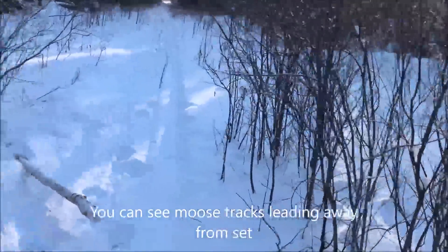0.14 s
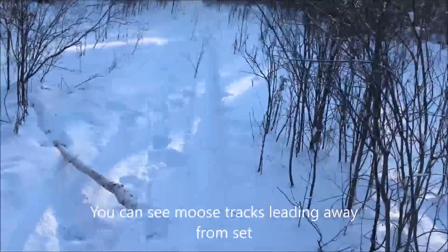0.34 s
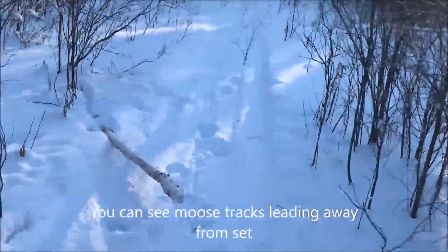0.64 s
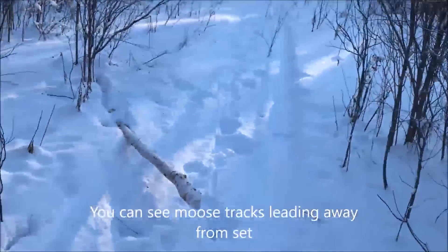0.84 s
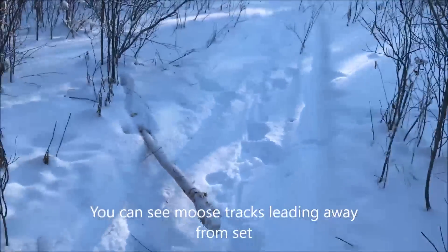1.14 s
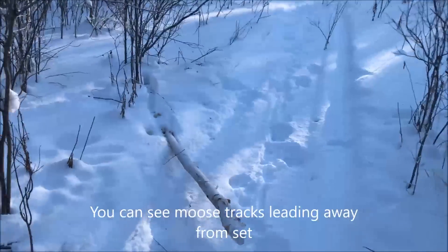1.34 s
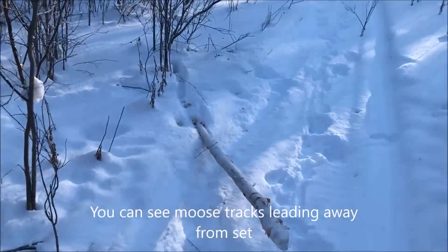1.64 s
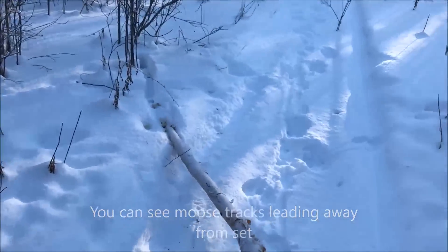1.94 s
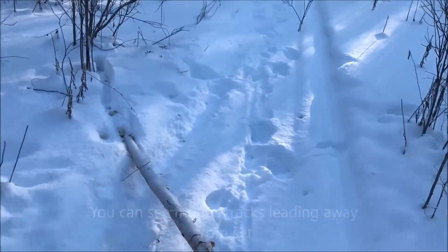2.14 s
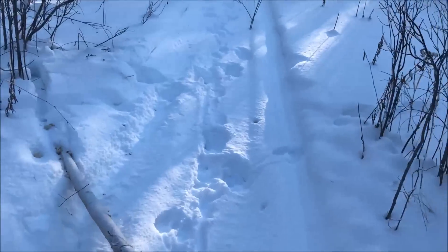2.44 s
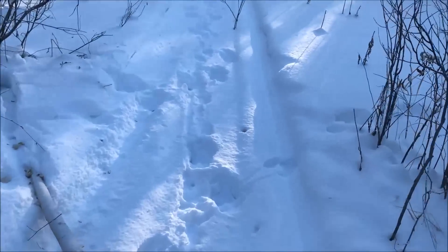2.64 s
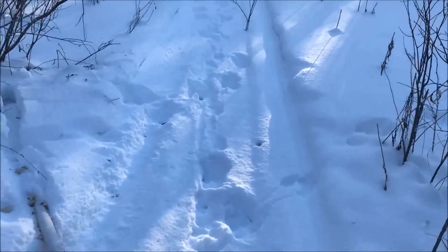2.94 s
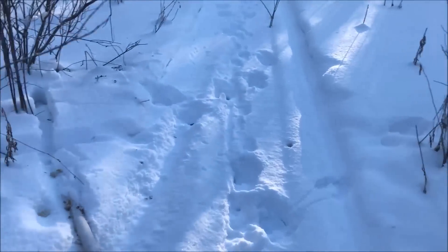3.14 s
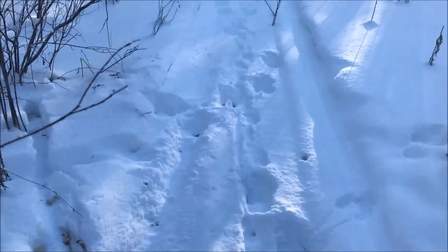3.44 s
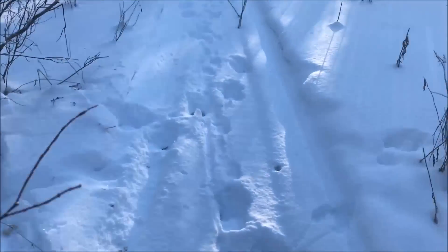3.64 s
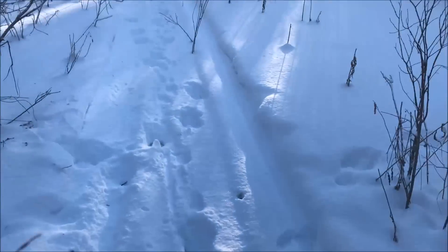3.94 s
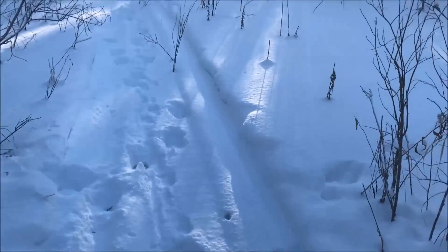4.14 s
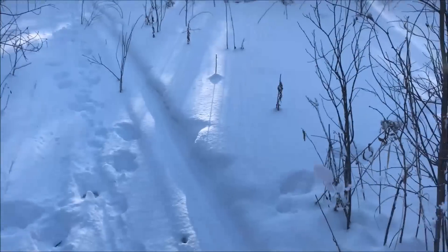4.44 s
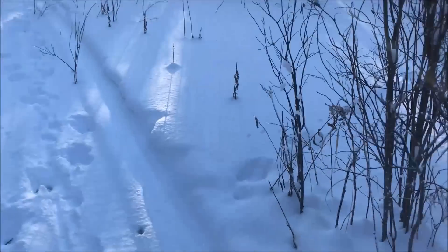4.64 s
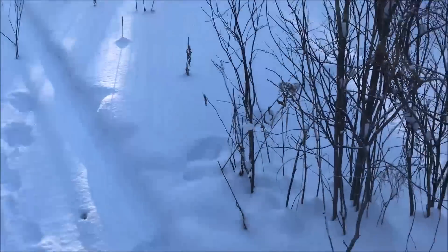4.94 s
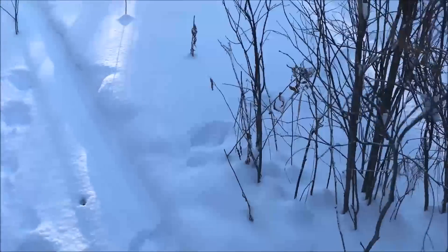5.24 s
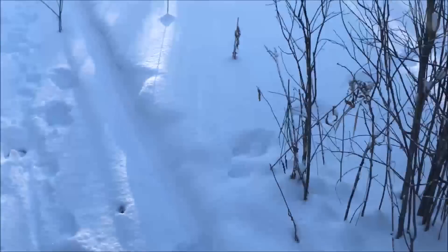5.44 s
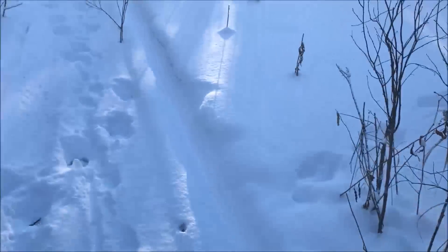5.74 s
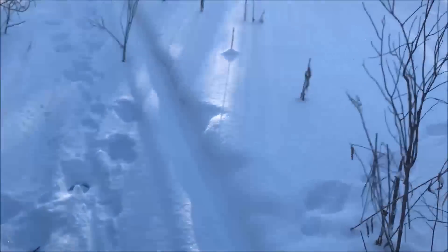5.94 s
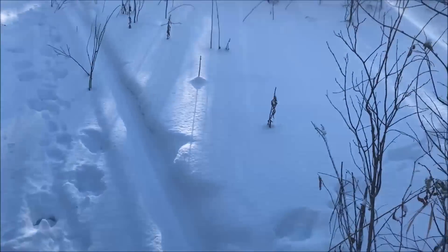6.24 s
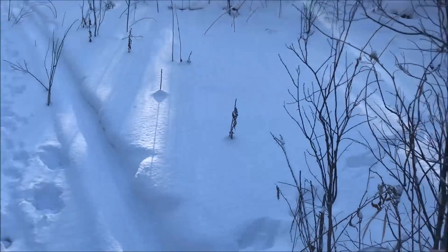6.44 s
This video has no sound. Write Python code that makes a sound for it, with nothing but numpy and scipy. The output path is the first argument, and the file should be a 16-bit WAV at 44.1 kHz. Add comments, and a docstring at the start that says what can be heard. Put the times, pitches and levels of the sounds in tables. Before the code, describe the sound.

A deep, lumpy engine idle runs throughout, sinking slightly as the walker moves off. Over it, near the microphone, come irregular snow crunches, soft low thuds, gritty creaks and rubbing fabric. One dry twig-like crack stands out early, bright cloth swishes mid-way, then a quieter lull before a heavy, crackly burst of movement. Dry mono sound, open winter air, no echo.

```python
"""A low exhaust tone lopes some way off: a snowmobile idling, its firings coming strong and weak.
Its partials swell and sag with the lope over a noise rumble, steady clatter and ringing hollows.
Close to the microphone someone walks in dry snow: shaped grains and chips make the boots crunch
and groan and the clothes rustle and swish. Crust and a twig snap in short bursts of ring or noise,
and dull thuds land underneath."""
import sys
import numpy as np
from scipy import signal
from scipy.fft import rfft, irfft
from scipy.io import wavfile
from scipy.ndimage import uniform_filter1d

SR = 44100
rng = np.random.default_rng(int(sys.argv[2]) if len(sys.argv) > 2 else 0)


def generate_wav(sig):
    """Save sig (samples, or channels by samples) to the path in sys.argv[1] as 16-bit PCM at SR."""
    pcm = np.round(np.clip(np.atleast_2d(sig).T, -1, 1) * 32767).astype(np.int16)
    wavfile.write(sys.argv[1], SR, pcm)


N = 291060

# Firing rate of the engine before the sag: t/s, f/Hz
FIRING_RATE = [(0.15, 67.0), (0.8, 66.6), (1.35, 67.0), (1.95, 65.9), (2.84, 67.9), (3.14, 67.5),
               (3.44, 67.8), (4.2, 67.0), (4.7, 68.2), (5.84, 67.5), (6.44, 67.35)]
# Surges of the lope: peak t/s, swell above the lull before/dB
LOPE_SURGES = [(0.025, 5.4), (0.106, 4.6), (0.23, 8.1), (0.32, 6.2), (0.425, 6.7), (0.53, 6.8),
               (0.638, 8.0), (0.758, 7.2), (0.862, 8.6), (0.954, 6.2), (1.064, 4.3), (1.192, 6.1),
               (1.301, 6.2), (1.392, 6.2), (1.501, 4.7), (1.609, 8.3), (1.701, 6.5), (1.803, 5.9),
               (1.926, 4.9), (2.058, 10.9), (2.16, 9.0), (2.276, 7.2), (2.4, 5.4), (2.508, 10.0),
               (2.633, 7.5), (2.747, 10.2), (2.855, 8.1), (2.98, 8.9), (3.122, 6.2), (3.22, 5.9),
               (3.342, 7.8), (3.462, 6.0), (3.6, 6.0), (3.694, 10.3), (3.78, 7.2), (3.872, 1.6),
               (3.957, 6.5), (4.048, 5.9), (4.133, 4.9), (4.253, 7.0), (4.406, 7.6), (4.524, 7.3),
               (4.64, 7.3), (4.727, 7.5), (4.842, 5.7), (4.95, 6.8), (5.073, 7.3), (5.201, 7.6),
               (5.281, 4.4), (5.36, 4.9), (5.46, 6.3), (5.584, 8.2), (5.702, 6.5), (5.804, 7.4),
               (5.887, 8.5), (5.992, 8.5), (6.116, 7.3), (6.226, 6.4), (6.357, 8.9), (6.44, 4.5),
               (6.536, 9.6)]
# Lope level at the peak of a usual surge, sinking as the walker moves away: t/s, level/dB
USUAL_SURGE_PEAK = [(0, -22.9), (1, -23.3), (2.3, -24.3), (3.3, -24.1), (4.4, -25.2), (6.6, -25.2)]
SWELL_SHARE = .47  # the swell takes this share of the time since the surge before
LIFT, USUAL_SWELL_DB = .2, 7  # a bigger swell also peaks higher, by this share
# Exhaust partials: multiple of the firing rate, level against the mean lope/dB, lope following/0-1
EXHAUST_PARTIALS = [(.5, -40, .2), (1, 0, 0.9), (1.5, -23, 0), (2, -25, 0), (2.5, -41, 0.3), (3, -42.5, 0),
                    (3.5, -39, 0.6), (4, -44.5, 0.4)]
SAG_HZ = 3.2  # rms at full following: pitch runs high as a surge swells and low as it dies
# Uneven firings blurred into a rumble, relative spectrum: f/Hz, level/dB per Hz
RUMBLE_SPECTRUM = [(22, -26), (31, -20), (39, -5), (47, 1.5), (55, -6), (67, -24), (80, -11), (90, -3),
                   (110, -9), (125, -14), (160, -19), (250, -26), (500, -47)]
RUMBLE_DB, RUMBLE_FOLLOW = -44, .15  # level at the mean lope; how far it follows the lope, 0-1
# Engine clatter and hiss under everything, relative spectrum: f/Hz, level/dB per Hz
CLATTER_SPECTRUM = [(120, 0), (200, -9), (310, 2), (372, 12), (455, 4), (644, -3), (719, -22), (1240, 4),
                    (1860, -29.5), (3280, -13), (4900, -32), (5470, -1.5), (7740, -20), (12900, -51.5),
                    (15800, -59)]
CLATTER_DB = -66.5  # rms before the final band limit
# Ringing hollows of the machine: f/Hz, width/Hz, level at the mean lope/dB
ENGINE_HOLLOWS = [(251, 4, -70), (358, 14, -64.5), (650, 27, -62), (750, 14, -75), (818, 14, -109)]

# Strokes of rubbing clothes: peak t/s, build-up/s, die-away/s, rustle gain/dB, swish gain/dB
CLOTH_STROKES = [(0.0, .01, 0.07, -57, -62), (.26, 0.28, 0.1, -61, -63.5), (.66, 0.063, 0.037, -55, -57.5),
                 (.77, 0.06, 0.092, -51.5, -56), (.84, 0.049, 0.028, -42, -54),
                 (.89, 0.013, .1, -48.5, -58), (.94, 0.052, 0.021, -41, -50.5),
                 (1.03, 0.077, 0.047, -41.5, -51), (1.135, 0.016, 0.024, -40, -43),
                 (1.17, .015, 0.07, -41.5, -54), (1.21, 0.037, .02, -41.5, -64),
                 (1.25, .03, 1, -53.5, -61.5), (1.63, 0.5, 0.023, -65, -74), (1.97, 0.23, 0.02, -41.5, -51),
                 (2.04, 0.037, 0.12, -56, -64), (2.257, 0.01, 0.031, -43.5, -51),
                 (2.28, 0.03, 0.01, -44, -50), (2.32, 1, .4, -53.5, -63), (2.43, .06, 0.011, -45.5, -50),
                 (2.52, 0.074, 0.0067, -47, -47.5), (2.6, 0.052, 0.36, -50, -51),
                 (2.72, 0.13, 0.35, -50, -52), (2.9, 0.16, 0.16, -51.5, -72), (2.99, .05, 0.046, -50, -62),
                 (3.075, 0.018, 0.019, -53, -69), (3.25, 0.095, 0.02, -63, -58),
                 (3.39, 0.027, .1, -69, -62), (3.55, 0.25, 0.11, -53, -57), (3.6, .02, 0.051, -57, -62),
                 (3.64, 0.025, 0.024, -54, -57), (3.82, 0.056, 0.035, -53, -59),
                 (3.92, 0.03, 0.04, -49, -62), (4.08, 0.031, 0.12, -38.5, -38),
                 (4.25, 0.087, 0.098, -42, -35.5), (4.37, 0.043, 0.031, -39, -33),
                 (4.49, 0.067, 0.048, -49, -64), (4.69, 0.67, 0.036, -48.5, -49.5),
                 (4.75, 0.041, .04, -68, -58), (4.805, .02, 0.036, -57.5, -54), (5.2, 1, 0.13, -78, -66.5),
                 (5.37, 0.065, 0.08, -57.5, -60), (5.48, 0.13, 0.032, -50.5, -58),
                 (5.53, 0.012, 0.026, -50.5, -55), (5.7, .02, 0.041, -60.5, -74),
                 (5.893, 0.015, 0.034, -53.5, -53), (5.96, 0.022, 0.068, -59, -64),
                 (6.01, 0.14, .06, -51.5, -57), (6.23, 0.01, 0.02, -34.5, -39.5),
                 (6.27, 0.022, 0.1, -39.5, -43.5), (6.44, 0.13, 0.62, -42, -46.5),
                 (6.538, 0.018, 0.041, -26.5, -38), (6.555, .03, 0.023, -32, -35),
                 (6.6, 0.083, .1, -51, -34.5)]
# Grainy rustle of stiff fabric, relative spectrum: f/Hz, level/dB per Hz
RUSTLE_SPECTRUM = [(710, -11), (1200, 1.5), (1710, -3.5), (2660, 1), (2740, 0.5), (3180, 0.5), (3400, 2),
                   (5640, -3), (8500, -13), (11000, -13), (18700, -120)]
# Finer, brighter swish, relative spectrum: f/Hz, level/dB per Hz
SWISH_SPECTRUM = [(3530, -52), (6000, -1.5), (6220, -4.5), (7410, -12), (9640, 2.5), (10500, -5.5),
                  (11300, 1.5), (15000, 2), (15800, -1)]
REST_RUSTLE_DB, REST_SWISH_DB = -65.5, -71  # fabric never lies quite still

# Boots pressing the snow: peak t/s, build-up/s, die-away/s, crunch gain/dB, groan gain/dB
BOOT_STROKES = [(0.0, .01, 0.016, -34.5, -38), (.24, 0.086, 0.054, -51, -46.5),
                (.52, 0.068, 0.031, -68, -49), (.66, 0.11, .3, -60, -52), (.83, 0.084, 0.13, -46.5, -47),
                (.93, 0.091, 0.036, -45, -45.5), (1.03, .07, 0.031, -44, -47),
                (1.19, 0.09, 0.18, -48.5, -44), (1.56, 0.3, 0.22, -48, -47.5),
                (1.91, 0.22, 0.14, -42.5, -42.5), (2.04, .015, 0.041, -50, -52),
                (2.26, .015, 0.057, -43, -41.5), (2.52, 0.81, 0.019, -47.5, -44.5),
                (2.6, 0.061, 0.33, -45, -51), (2.72, 0.19, 0.095, -44.5, -38), (2.84, .03, 0.37, -54, -48),
                (3.01, .04, 0.072, -57, -42.5), (3.178, .015, 0.028, -46.5, -43),
                (3.38, 0.034, 0.11, -53, -48.5), (3.51, 0.085, 0.11, -39.5, -43.5),
                (3.595, .015, .04, -47, -42.5), (3.64, 0.015, 0.024, -45, -40),
                (3.78, 0.017, 0.22, -47, -55), (3.84, 0.037, 0.025, -46, -44), (3.91, .03, 0.11, -57, -68),
                (3.98, 0.011, 0.023, -51, -57), (4.06, 0.042, 0.18, -38.5, -40.5),
                (4.39, 0.072, 0.087, -62, -47.5), (4.7, 0.64, 0.08, -44.5, -56),
                (4.752, .02, 0.039, -37, -44), (4.81, 0.052, .3, -52, -52), (4.922, 0.012, 0.024, -46, -44),
                (5.48, 0.12, 0.082, -41.5, -42.5), (5.97, 0.038, 0.051, -37.5, -36.5),
                (6.23, 0.022, 0.028, -30, -35.5), (6.29, .03, 0.14, -44, -48.5), (6.38, .05, 0.1, -49, -52),
                (6.51, 0.059, 0.2, -42.5, -44.5)]
# Crush of packing snow, relative spectrum: f/Hz, level/dB per Hz
CRUSH_SPECTRUM = [(250, -45), (420, -8), (612, 1.5), (699, -2.5), (885, 1), (1570, -9.5), (2960, -23),
                  (4000, -44), (5200, -43), (8800, -120)]
# Deeper groan of snow packing down, relative spectrum: f/Hz, level/dB per Hz
GROAN_SPECTRUM = [(90, -14), (130, 5), (200, -2.5), (300, -2), (400, -6), (550, -19)]
REST_CRUNCH_DB, REST_GROAN_DB = -56.5, -58.5  # snow settling between the steps
STROKE_DB = 15  # a stroke climbs this much in its build-up and falls this much in its die-away

# In the next three tables level is the envelope peak, before the mix of ring and noise.
# Dull thuds of weight landing: t/s, level/dB, settled pitch f/Hz, t60/s
WEIGHT_THUDS = [(0.237, -46, 127, 0.046), (0.828, -37, 158, 0.083), (1.126, -32, 273, 0.025),
                (1.164, -39, 226, 0.07), (1.211, -19.5, 124, 0.0093), (1.914, -36, 156, 0.055),
                (2.719, -43, 143, 0.026), (3.589, -36, 160, 0.05), (4.045, -35, 119.4, 0.039),
                (6.224, -37, 170, 0.03)]
# Dry snaps: t/s, level/dB, band centre f/Hz
DRY_SNAPS = [(0.9946, -37, 3940), (1.1277, -8.5, 3200), (1.159, -31, 4500), (1.1702, -35, 4050),
             (1.8372, -33, 3640), (2.0308, -45, 3940), (2.415, -35, 3710), (2.5004, -42, 3700),
             (2.5661, -31, 4200), (2.629, -40, 3580), (2.9203, -42, 3890), (2.8918, -50, 3970),
             (2.9816, -42, 3760), (3.2415, -34, 7170), (4.0397, -37, 4170), (4.0747, -23, 11600),
             (4.3261, -38, 11200), (4.3482, -17, 11200), (4.36, -22, 4000), (4.375, -24, 11500),
             (4.4824, -28, 4290), (6.22, -44, 4000), (6.346, -33, 5140), (6.4093, -28, 11700),
             (6.4823, -25, 3550), (6.4996, -28, 3890), (6.5326, -29, 3860), (6.54, -14, 5580)]
SNAP_T60_S = 0.013
# Crust giving way under a boot, often in a quick run: t/s, level/dB, settled pitch f/Hz, run/s
CRUST_BREAKS = [(0.2275, -42, 910, .02), (0.8221, -42, 796, .01), (0.9129, -42, 915, .03),
                (1.0087, -40, 780, .025), (1.1654, -38.5, 675, 0), (1.4238, -39.5, 760, 0),
                (1.5026, -39, 756, .01), (1.5545, -37, 724, 0), (1.6063, -42, 910, .025),
                (1.748, -40, 910, 0), (1.8368, -34, 836, 0), (1.9062, -33.5, 780, 0),
                (1.9366, -38, 777, .04), (2.0239, -34.5, 820, 0), (2.0305, -32.5, 860, .01),
                (2.193, -38.5, 865, 0), (2.2534, -33, 686, .02), (2.4125, -38, 604, 0),
                (2.5053, -37.5, 750, .011), (2.6934, -45, 1010, 0), (2.7148, -37.5, 650, .01),
                (2.7542, -38, 854, .01), (2.9209, -37, 1050, 0), (3.1723, -39.5, 482, .018),
                (3.3788, -39, 960, .011), (3.4646, -38.5, 915, 0), (3.4941, -40, 607, 0),
                (3.528, -34.5, 620, 0), (3.5554, -32.5, 534, .01), (3.5893, -34.5, 690, .01),
                (3.6347, -31, 620, .01), (3.8238, -35.5, 545, .015), (4.0139, -41, 1280, 0),
                (4.0518, -33.5, 850, .01), (4.0727, -38, 770, .032), (4.1296, -39, 1120, 0),
                (4.3596, -42, 2180, 0), (4.7377, -35.5, 680, 0), (4.7449, -33.5, 670, .018),
                (4.9178, -34.5, 670, .01), (5.4661, -44, 650, .022), (5.5215, -37.5, 540, .01),
                (5.8936, -39.5, 900, 0), (5.9624, -37, 865, 0), (5.9718, -34, 604, .016),
                (6.0054, -30, 480, 0), (6.166, -33, 570, .01), (6.2109, -27.5, 650, 0),
                (6.2318, -35, 890, 0), (6.2493, -31.5, 920, .013), (6.363, -29.5, 537, 0),
                (6.4089, -36, 1200, 0), (6.4329, -31.5, 675, .018), (6.4823, -31.5, 1380, 0),
                (6.4997, -36, 920, .01), (6.5322, -28.5, 1980, .01)]
SLIP_GAP_S, SLIP_SPREAD_DB, CRUST_T60_S = .0065, 2, 0.031
SLIP_PITCH_SPREAD = .15  # standard deviation of the natural log of pitch

EDGE_HZ = 15830


def amp(db):
    """Decibels to gain."""
    return 10 ** (np.asarray(db) / 20)


def evened(x):
    """Scales to rms 1."""
    return x / np.sqrt(np.mean(x ** 2) + 1e-20)


def curve(rows, order=1):
    """One column of a table, read at every sample."""
    rows = np.asarray(rows)
    return np.interp(np.arange(N) / SR, rows[:, 0], rows[:, order])


def coloured(x, shape):
    """Filters x through a spectral curve drawn over log frequency, then sets it to rms 1."""
    hz, db = np.transpose(shape)
    f = np.fft.rfftfreq(N, 1 / SR)
    gain = amp(np.interp(np.log(f + 1), np.log(hz), db, -120, -120))
    return evened(irfft(rfft(x) * gain, N))


def sparse_sizes(per_s, spread_db):
    """Random moments of uneven size, zero in between."""
    sizes = amp(spread_db * np.minimum(rng.exponential(1, N), 5))
    return sizes * (rng.random(N) < per_s / SR)


def grains(per_s, spread_db, share, lumps_db, lump_s):
    """Hiss mixed with sparse clicks of uneven size, all in short lumps."""
    clicks = evened(sparse_sizes(per_s, spread_db) * rng.standard_normal(N))
    width = max(int(lump_s * SR), 2)
    smoothed = uniform_filter1d(rng.standard_normal(N), width)
    lumps = evened(uniform_filter1d(smoothed, width))
    share = np.clip(share, 0, 1)
    hiss = np.sqrt(1 - share ** 2) * rng.standard_normal(N)
    return amp(lumps_db * lumps) * (share * clicks + hiss)


def chips(per_s, spread_db, lo_hz, hi_hz, turns):
    """Tiny breaks of uneven size, each ringing a few turns at one of 24 pitches."""
    size = sparse_sizes(per_s, spread_db)
    kind, out = rng.integers(0, 24, N), np.zeros(N)
    for k, hz in enumerate(np.geomspace(lo_hz, hi_hz, num=24)):
        phase = np.arange(0, 4 * turns, hz / SR)
        ring = np.sqrt(hz) * np.sin(2 * np.pi * phase) * np.exp(-phase / turns)
        out += signal.oaconvolve(size * (kind == k), ring)[:N]
    return evened(out)


def strokes(rows, rest_db, order):
    """Gain of one layer: every stroke builds to its peak and dies away, over a resting level."""
    t = np.arange(0, N, 16) / SR
    power = amp(2 * rest_db) * np.ones(len(t))
    for row in rows:
        s, build_s, die_s = row[:3]
        away = np.maximum((s - t) / max(build_s, .005), (t - s) / max(die_s, .005))
        power = power + amp(2 * (row[order] - STROKE_DB * away))
    return np.interp(np.arange(N) / SR, t, np.sqrt(power))


def add(mix, s, sound):
    """Mixes a sound in at time s."""
    part = mix[round(s * SR):][:len(sound)]
    part += sound[:len(part)]


def bursts(events, width, rise_s, ring, noise_db, glide):
    """Short dying sounds: a ring that sinks to its pitch plus noise in a broad band around it."""
    out = np.zeros(N)
    t = np.arange(4000) / SR
    noises = rng.standard_normal((len(events), 4000))
    for (s, db, hz, t60), noise in zip(events, noises):
        t60 = max(t60, .004)
        band = np.clip([hz / width, hz * width], 50, 20000)
        bandpass = signal.butter(2, band, "band", fs=SR, output="sos")
        burst = evened(signal.sosfilt(bandpass, noise))
        shape = (1 - np.exp(-t / rise_s)) * amp(-60 * t / t60)
        turns = np.cumsum(hz * (1 + glide * np.exp(-t / (0.031 * t60)))) / SR
        sound = ring * np.sin(2 * np.pi * turns) + amp(noise_db) * burst
        add(out, s, amp(db) * sound * shape / shape.max())
    return out


def lope():
    """Engine level in dB, easing from lull to surge and back on half cosines."""
    s, swell_db = np.transpose(LOPE_SURGES)
    peak_db = np.interp(s, *np.transpose(USUAL_SURGE_PEAK)) + LIFT * (swell_db - USUAL_SWELL_DB)
    lull_s = s - SWELL_SHARE * np.diff(s, prepend=0)
    times = np.ravel([lull_s, s], "F")  # lull, peak, lull, peak...
    levels = np.ravel([peak_db - swell_db, peak_db], "F")
    points = np.arange(len(times) + 1)
    place = np.interp(np.arange(N) / SR, np.r_[times, N / SR], points)
    eased = np.floor(place) + .5 - .5 * np.cos(np.pi * (place % 1))
    return np.interp(eased, points, np.r_[levels, levels[-1] - USUAL_SWELL_DB])


def clatter():
    """Steady engine clatter and hiss: coloured grains."""
    return coloured(grains(550, 2.2, 0.56, .8, 0.0068), CLATTER_SPECTRUM) * amp(CLATTER_DB)


def hollows(lope_db):
    """Narrow resonators turn noise into fuzzy notes that throb slightly with the lope."""
    out = np.zeros(N)
    for hz, width, level_db in ENGINE_HOLLOWS:
        r = np.exp(-np.pi * width / SR)
        poles = [1, -2 * r * np.cos(2 * np.pi * hz / SR), r * r]
        out += amp(level_db) * evened(signal.lfilter([1], poles, rng.standard_normal(N)))
    return out * amp(0.11 * lope_db)


def firing_rumble(turns, lope_db):
    """One pulse of random strength per firing, blurred with noise into a low rumble."""
    fires = np.diff(np.floor(turns), prepend=0) * rng.standard_normal(N)  # above or below the mean
    uneven = evened(fires * amp(.7 * lope_db)) + .3 * rng.standard_normal(N)
    return coloured(uneven, RUMBLE_SPECTRUM) * amp(RUMBLE_DB + RUMBLE_FOLLOW * lope_db)


def exhaust_tone(turns, sag, mean_db, lope_db):
    """Partials of the firing rate, each following the lope in level and pitch by its own share."""
    tone = np.zeros(N)
    for k, level_db, follow in EXHAUST_PARTIALS:
        phase = 2 * np.pi * (k * turns + follow * sag) + (k - 1) ** 2
        tone += amp(mean_db + level_db + follow * lope_db) * np.cos(phase)
    return tone


def engine():
    """Exhaust, rumble and hollows share one lope; the clatter stays steady."""
    level_db = lope()
    mean_db = level_db.mean()
    lope_db = level_db - mean_db
    swelling = evened(uniform_filter1d(np.gradient(level_db), 900))
    turns = np.cumsum(curve(FIRING_RATE)) / SR
    sag = np.cumsum(SAG_HZ * swelling) / SR
    tone = exhaust_tone(turns, sag, mean_db, lope_db)
    return tone + firing_rumble(turns + sag, lope_db) + clatter() + hollows(lope_db)


def clothes():
    """Stiff fabric: a grainy rustle with scrape ticks, and a finer, brighter swish."""
    rustle = coloured(grains(1500, 4.0, 0.4, 1.97, 0.018), RUSTLE_SPECTRUM)
    rustle = rustle + 0.34 * chips(700, 3.86, 1750, 6930, 8.7)  # scrape ticks
    swish = coloured(grains(3100, 1.3, 0.58, 2.1, 0.011), SWISH_SPECTRUM)
    rubbed = strokes(CLOTH_STROKES, REST_RUSTLE_DB, order=3) * rustle
    return rubbed + strokes(CLOTH_STROKES, REST_SWISH_DB, order=4) * swish


def boots():
    """Snow crystals crush in coarse grains and ringing chips, over a groan, while weight goes on."""
    crush = coloured(grains(300, 3.0, 0.21, 1.1, 0.0065), CRUSH_SPECTRUM)
    groan = coloured(grains(100, 3.3, 0.44, 2.3, 0.011), GROAN_SPECTRUM)
    crunch = 0.61 * crush + 0.42 * chips(500, 3.1, 507.5, 1776, 9.5)
    pressed = strokes(BOOT_STROKES, REST_CRUNCH_DB, order=3) * crunch
    return pressed + strokes(BOOT_STROKES, REST_GROAN_DB, order=4) * groan


def thuds():
    """Weight landing: a low ring that sinks to its pitch, with a little noise."""
    return bursts(WEIGHT_THUDS, 1.4, .001, 1.3, -18, .3)


def snaps():
    """Dry snaps: broad noise bursts with a very fast rise and no ring."""
    return bursts([(*row, SNAP_T60_S) for row in DRY_SNAPS], 4.0, .0001, 0, -8, 0)


def slips():
    """Each break of the crust goes on in slips of scattered size and pitch until its run is over."""
    luck = rng.standard_normal((len(CRUST_BREAKS), 8, 3))
    rows = []
    for (s, db, hz, run_s), draws in zip(CRUST_BREAKS, luck):
        rows.append((s, db, hz, CRUST_T60_S))
        for k, (late, size, pitch) in enumerate(draws, 1):
            if k * SLIP_GAP_S <= run_s:
                slip_s = s + SLIP_GAP_S * (k + 0.18 * late)
                slip_hz = hz * np.exp(SLIP_PITCH_SPREAD * pitch)
                rows.append((slip_s, db + SLIP_SPREAD_DB * size, slip_hz, CRUST_T60_S))
    return rows


def crusts():
    """Breaking crust: each slip rings down to its pitch inside a burst of noise."""
    return bursts(slips(), 3.2, .0007, .85, -7.5, .5)


def scene():
    """Engine and walker meet in open, dead snow: one channel, no echo."""
    steady = engine() + boots() + clothes()
    return (steady + thuds() + snaps() + crusts())[None]


def record(dry):
    """Band limit: a steep low-pass takes off the extreme top."""
    lowpass = signal.firwin(1023, EDGE_HZ, window=("kaiser", 9), fs=SR)
    return signal.oaconvolve(dry, lowpass[None], "same")


dry = scene()
out = record(dry)
generate_wav(out)
```